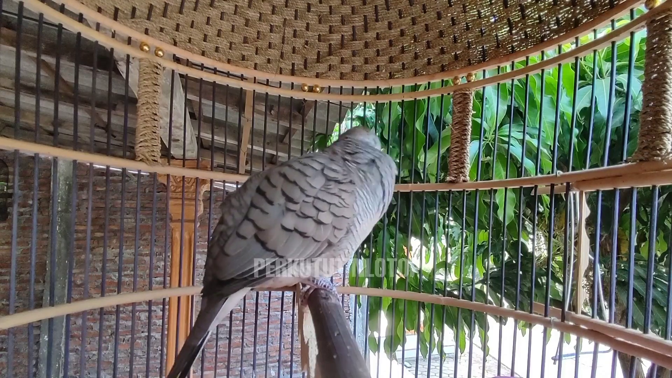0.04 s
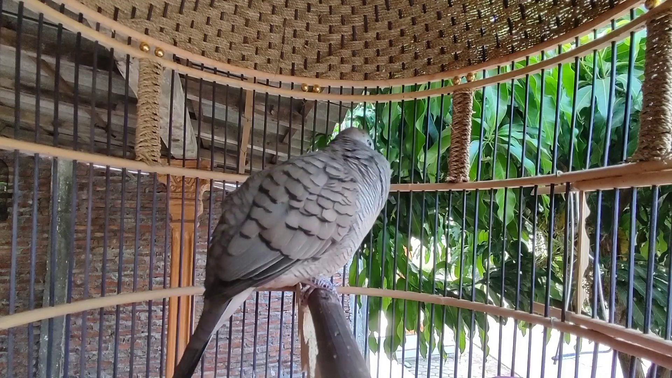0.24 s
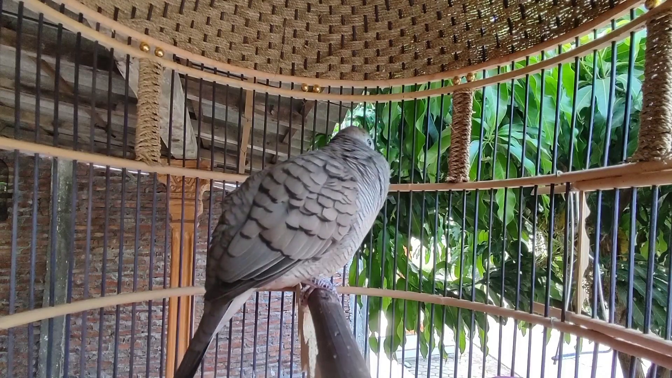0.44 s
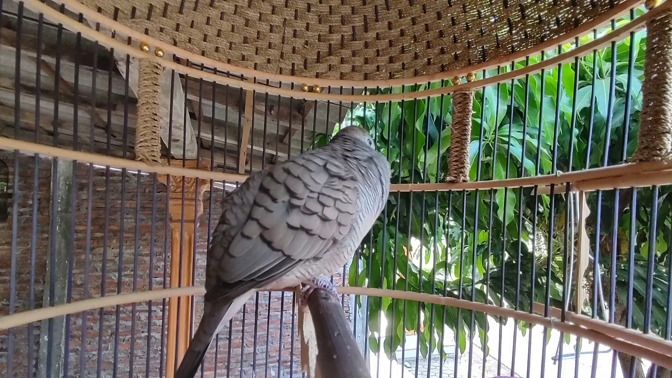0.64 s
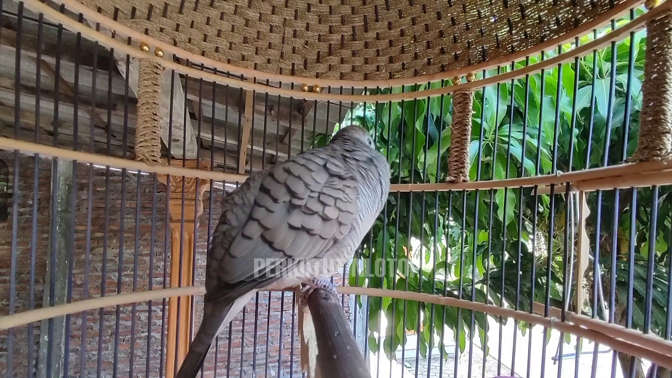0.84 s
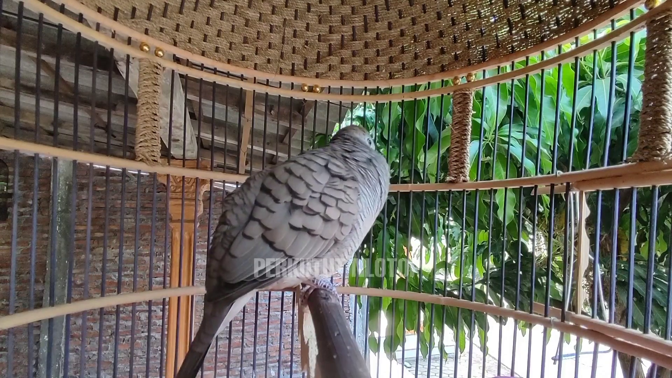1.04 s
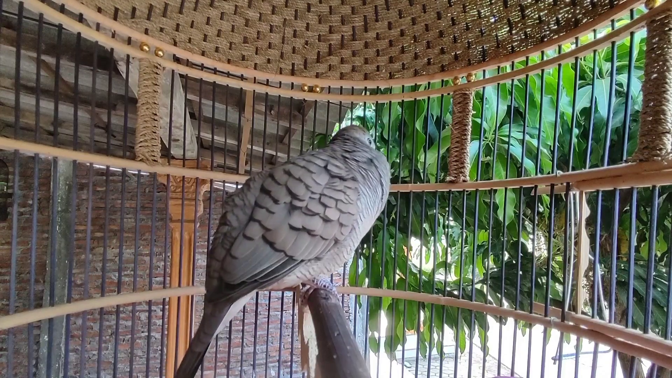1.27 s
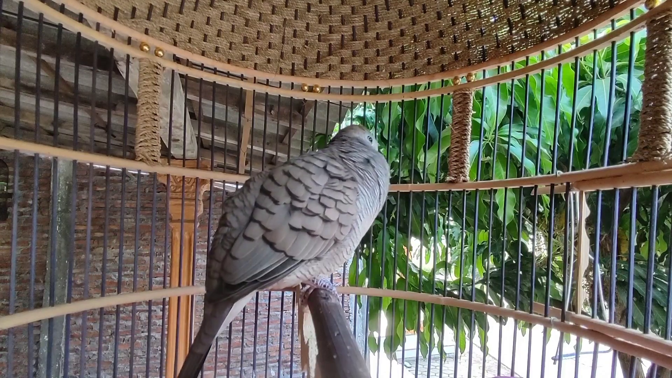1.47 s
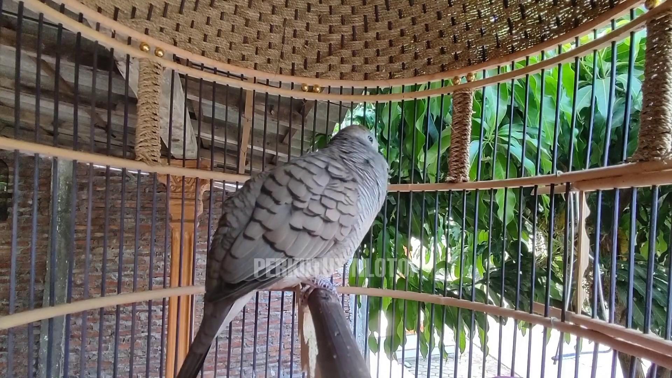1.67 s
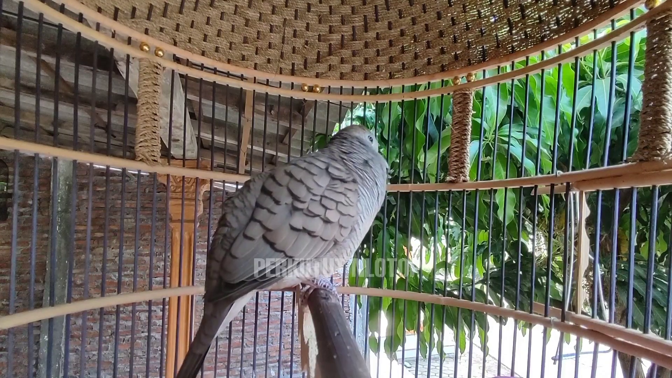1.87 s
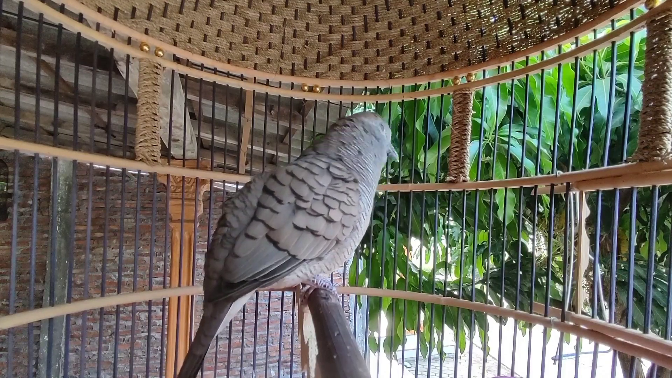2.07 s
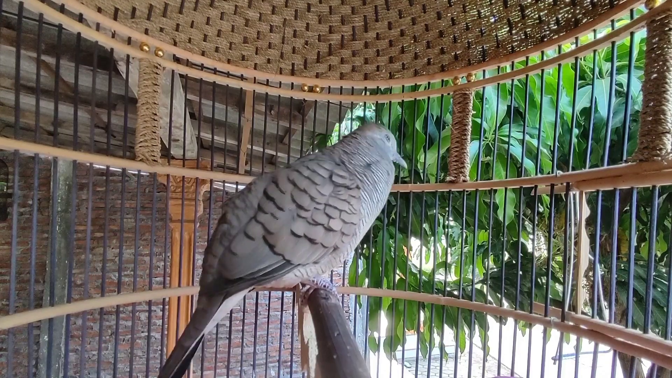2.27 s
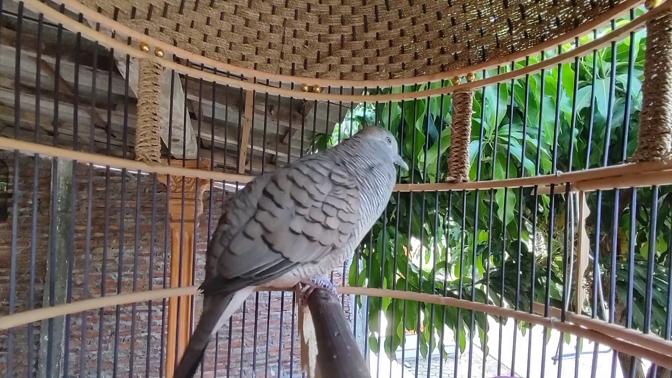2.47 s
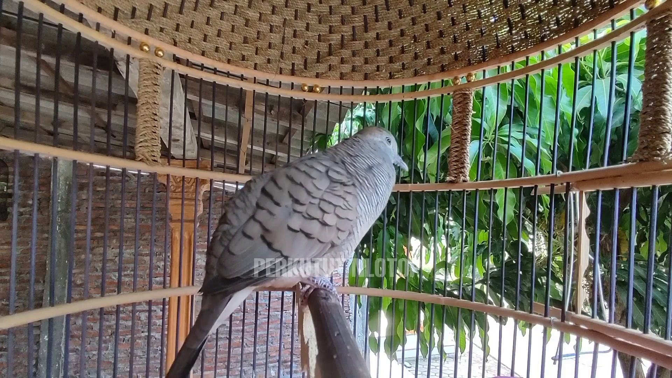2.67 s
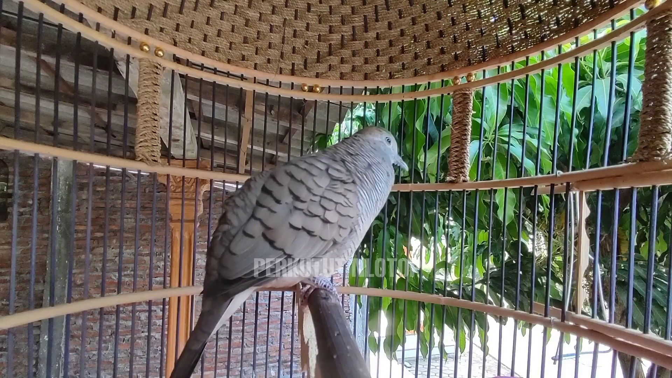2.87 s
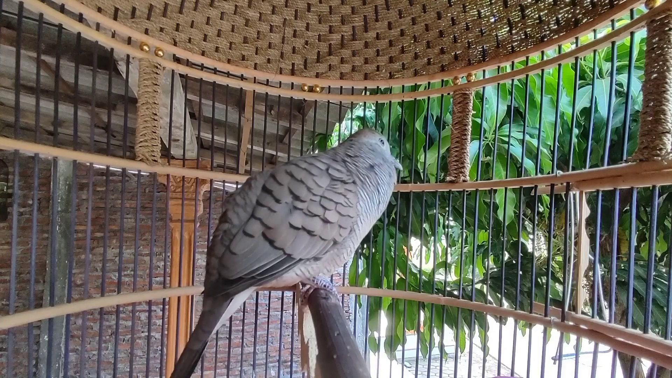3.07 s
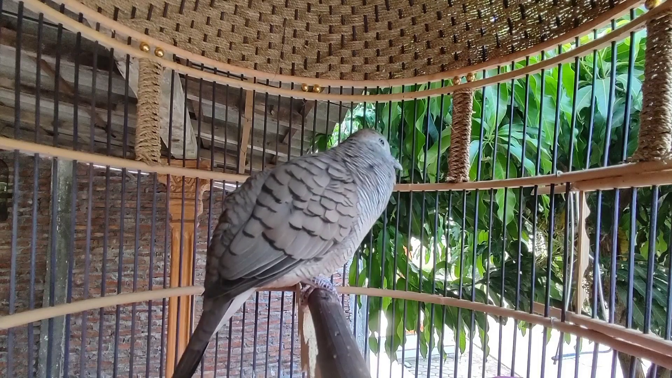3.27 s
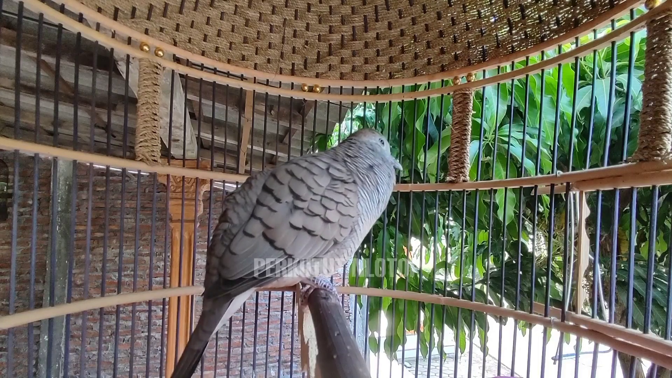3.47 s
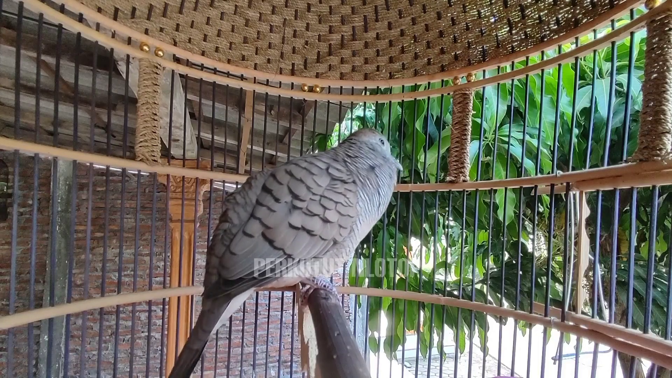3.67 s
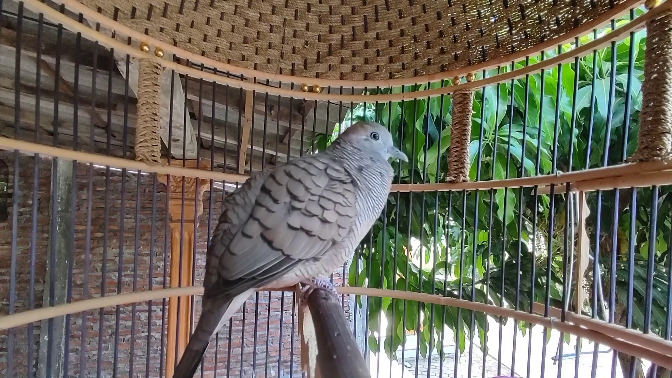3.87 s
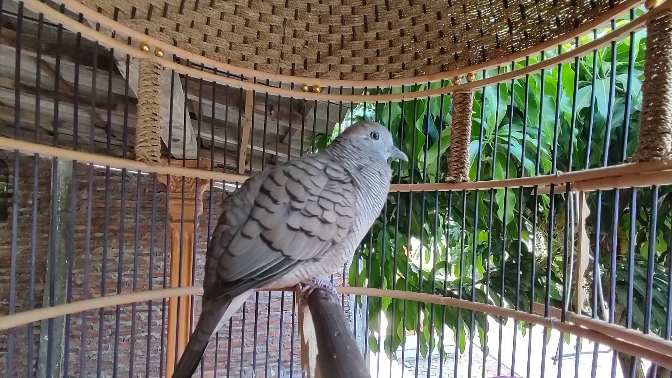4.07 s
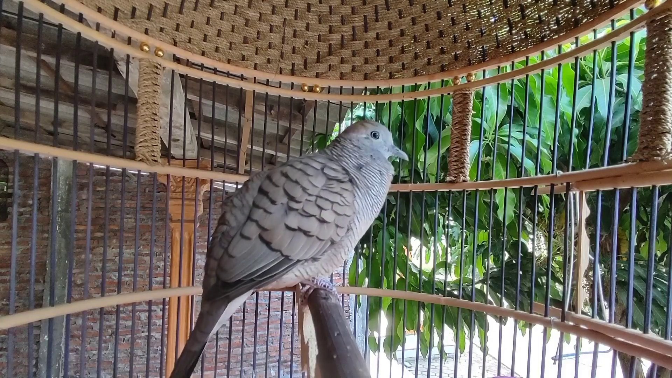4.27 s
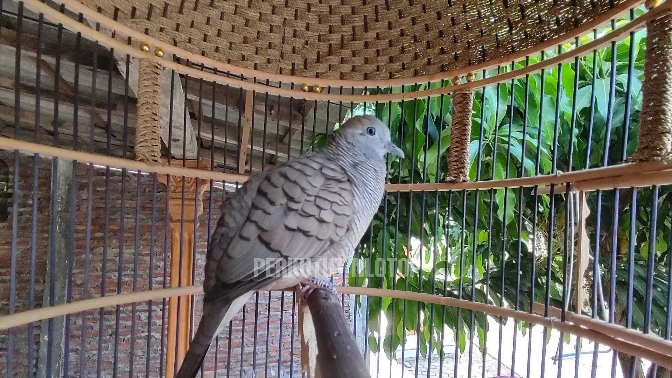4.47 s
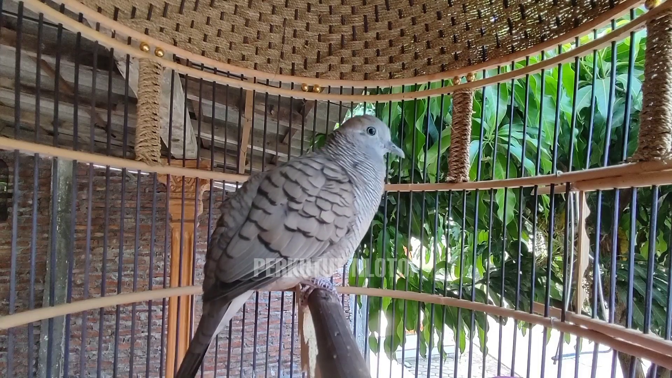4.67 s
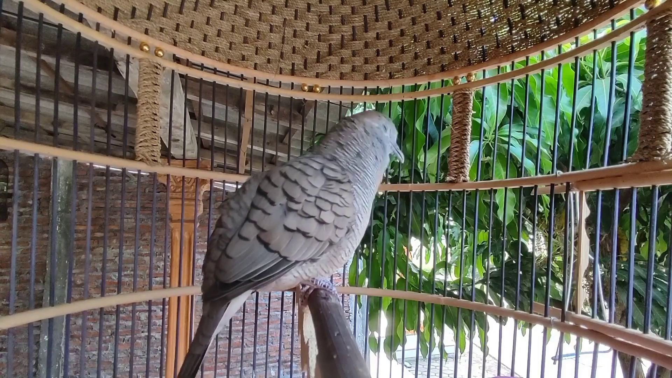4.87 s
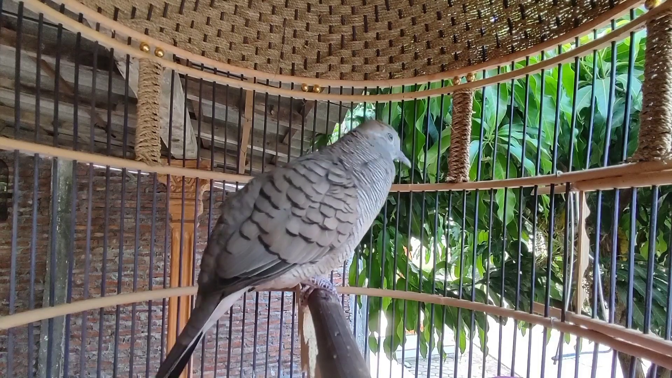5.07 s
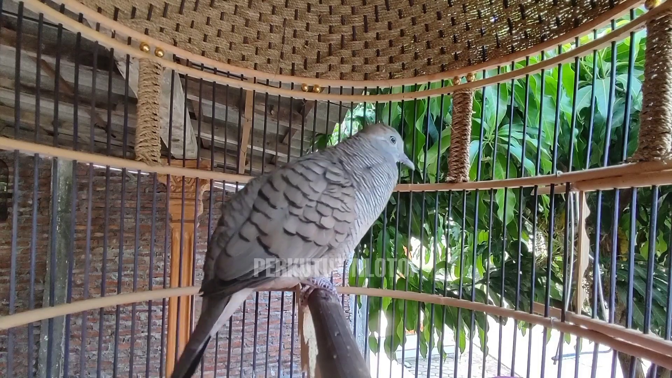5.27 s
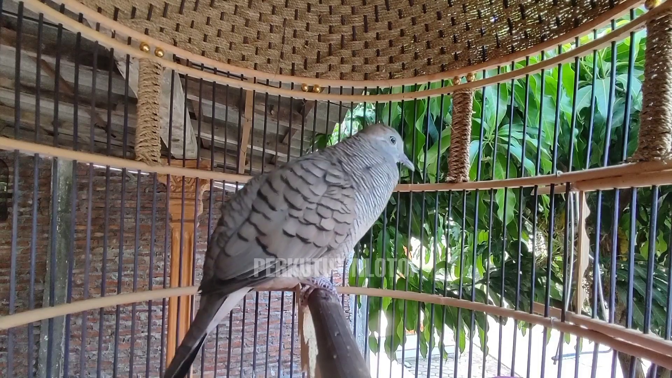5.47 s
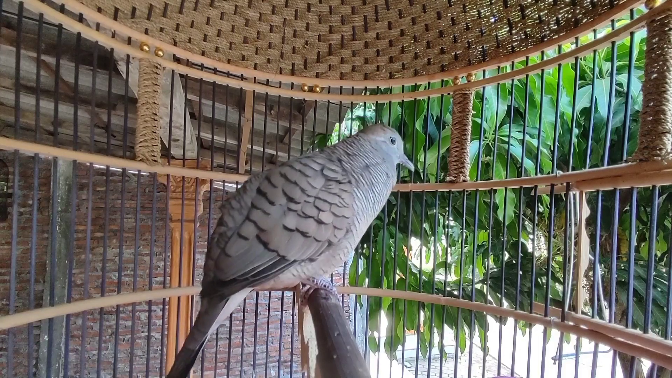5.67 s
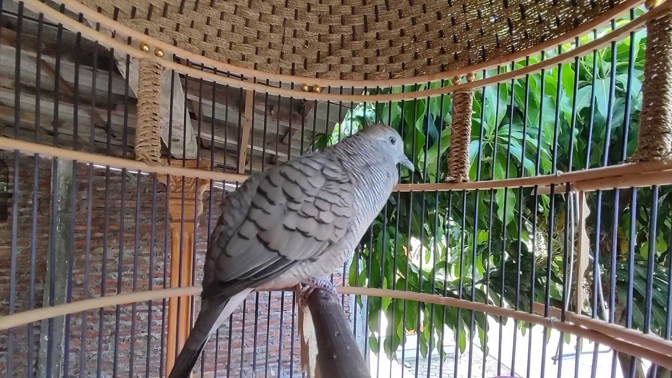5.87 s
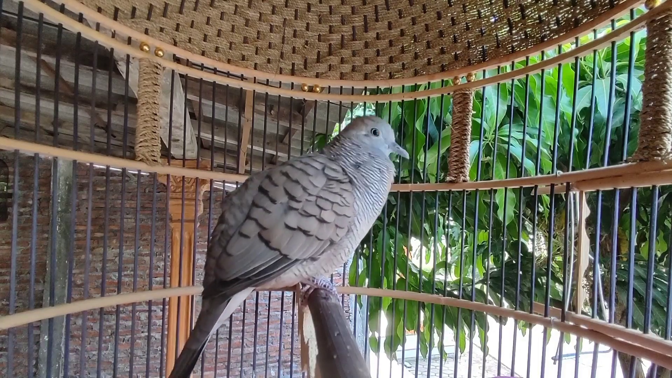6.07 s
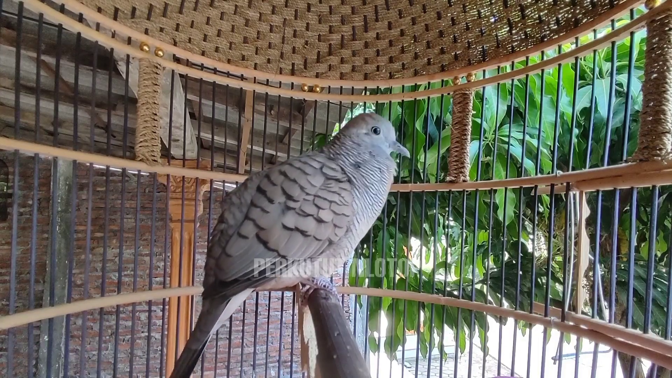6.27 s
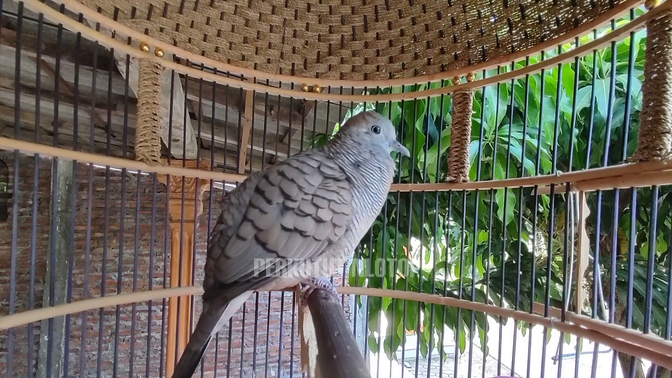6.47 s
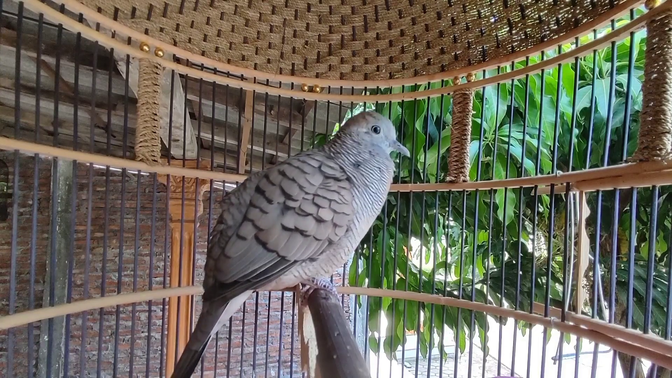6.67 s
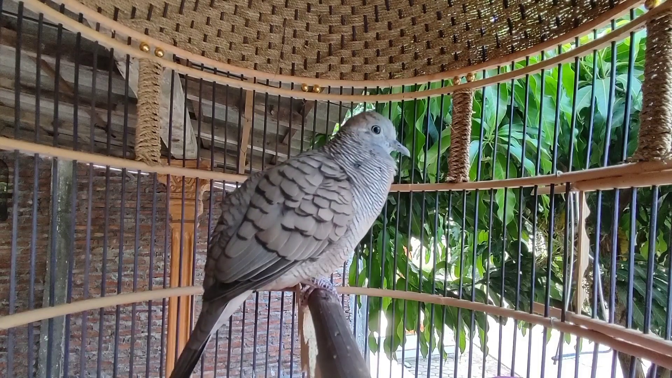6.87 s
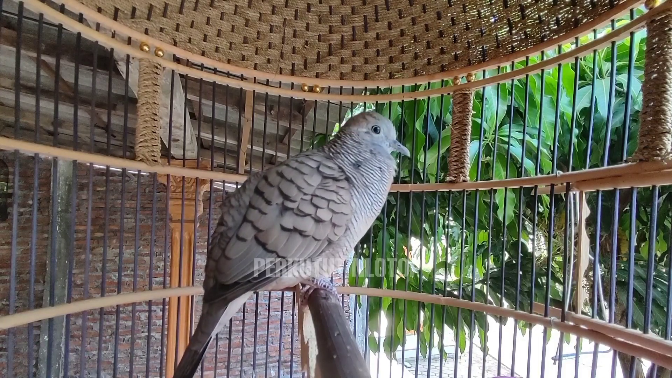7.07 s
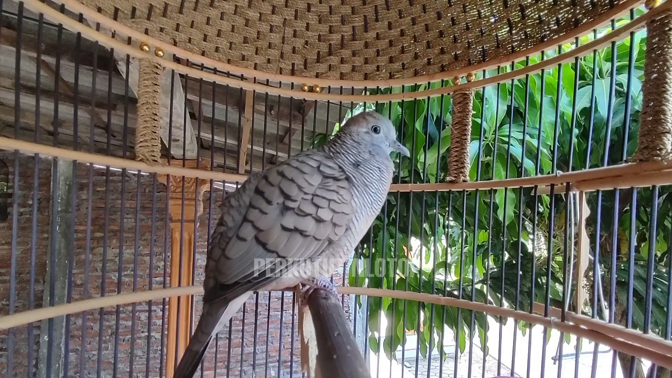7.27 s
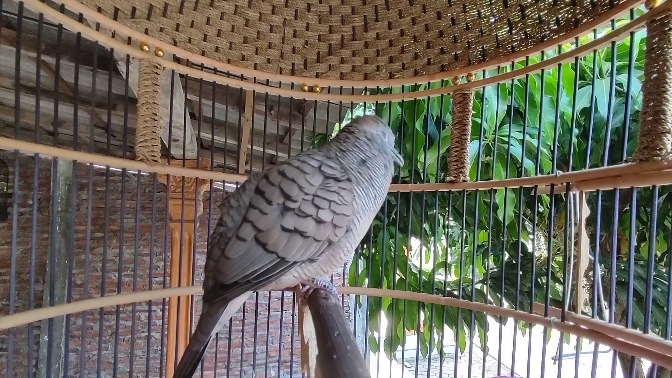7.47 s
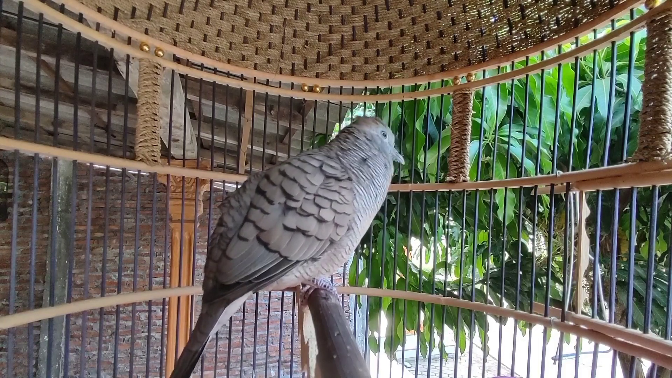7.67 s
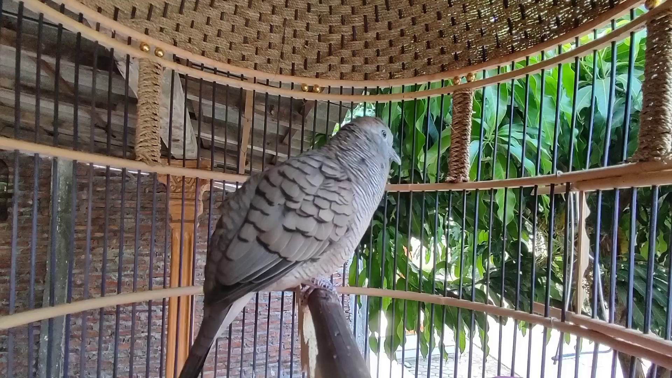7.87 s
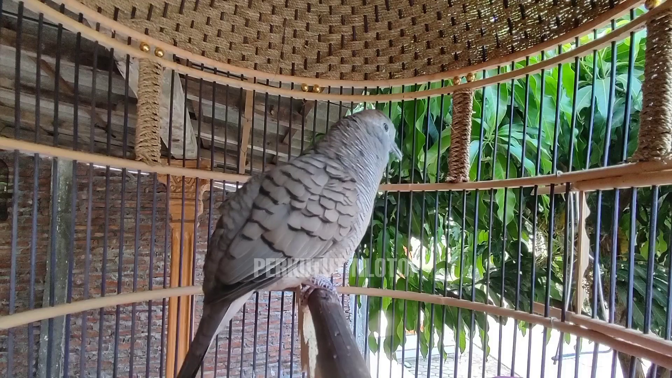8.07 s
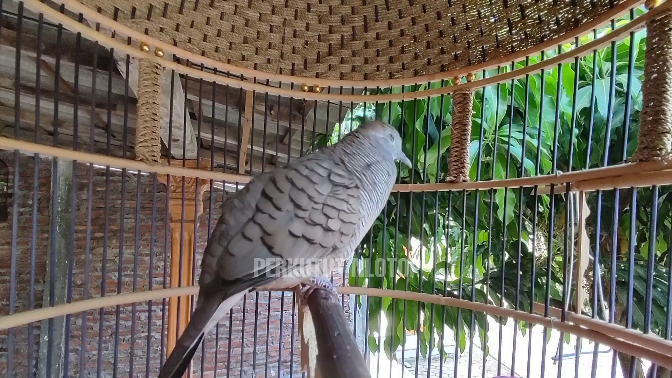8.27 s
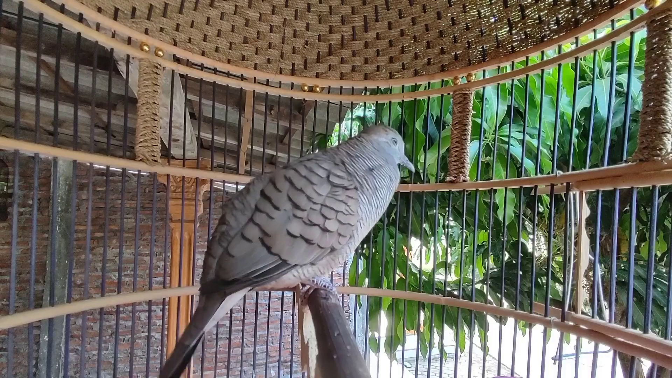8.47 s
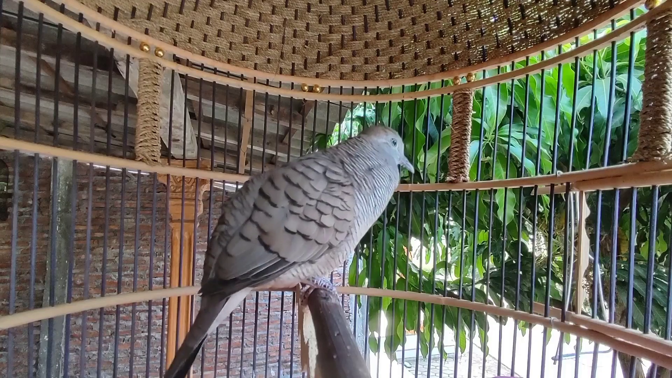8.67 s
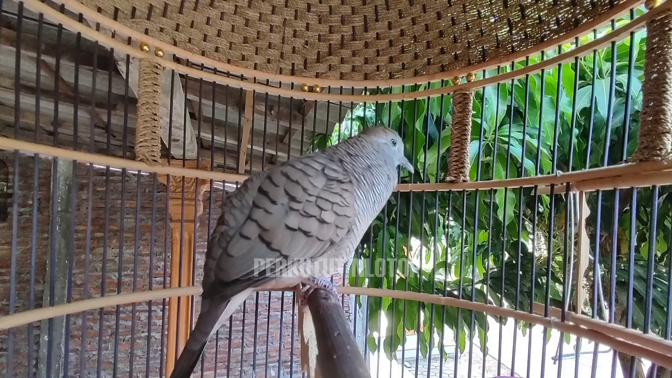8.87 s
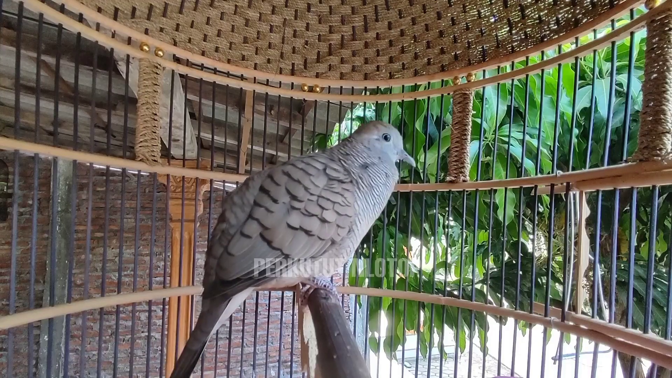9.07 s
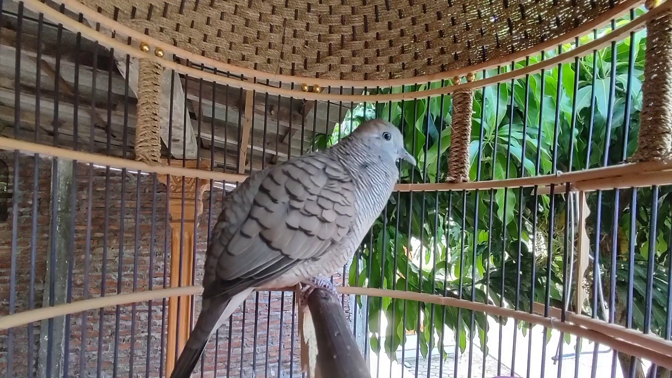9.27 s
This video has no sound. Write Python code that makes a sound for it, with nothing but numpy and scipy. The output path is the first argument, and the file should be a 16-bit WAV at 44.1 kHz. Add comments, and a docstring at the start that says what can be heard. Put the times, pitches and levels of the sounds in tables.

```python
"""A cooing zebra dove

A caged zebra dove coos three times close by: a long quavering note, two short ones and a level last one.
Each note opens with a rasp of quick flaps, then becomes a nearly pure tone (a sine with faint overtones).
Delayed copies and a noise tail give the echoes of cage and porch, and the tone beats against them.
Another dove and small birds whistle far off as gliding sines. Ticks, a rustle and a low outdoor
rumble are shaped noise."""
import sys
import numpy as np
from scipy import signal
from scipy.fft import rfft, irfft, next_fast_len
from scipy.io import wavfile
from scipy.ndimage import uniform_filter1d, map_coordinates

SR = 44100
rng = np.random.default_rng(int(sys.argv[2]) if len(sys.argv) > 2 else 0)


def pcm_store(signal):
    """Save signal as 16-bit PCM."""
    levels = np.round(np.clip(np.atleast_2d(signal), -1, 1) * 32767)
    wavfile.write(sys.argv[1], SR, levels.astype(np.int16).T)


N = 411012  # length of the scene in samples

# In all tables, levels are those before the later gains, filters and echoes.
# Path of pitch and level through each kind of note: time_s, pitch_hz, level_db
LONG = [(0, 902, -26), (.006, 944, -14.5), (.02, 1004, -12.5), (.0235, 1180, -11.3), (.036, 1194, -9.9),
        (.11, 1169, -11.2), (.185, 1121, -12), (.194, 1085, -38)]
SHORT = [(0, 780, -34), (.0055, 897, -17), (.008, 981, -15), (.013, 1104, -14), (.022, 1115, -14.3),
         (.033, 1085, -18.5), (.046, 1060, -39)]
LAST = [(0, 779, -35), (.007, 892, -16), (.011, 973, -14), (.014, 1101, -16), (.025, 1127, -13),
        (.045, 1135, -13), (.08, 1122, -14), (.1, 1073, -19), (.113, 1067, -39)]
# The near dove's phrase: start_s (within the call), shape, gain_db, rasp_length_s
PHRASE = [(0, LONG, 0.04, .022), (0.2069, SHORT, -0.8, .005), (0.2811, SHORT, 0.2, .007),
          (.3647, LAST, -0.4, .007)]
# The near dove's calls: start_s, time_stretch (1 = as in the phrase)
COOS = [(2.2924, 1), (5.1407, 1.013), (8.3153, .977)]
# How strongly throat and beak pass the overtones: frequency_hz, gain_db
THROAT = [(1600, -27), (2000, -31.5), (2220, -34), (2380, -47), (3400, -38), (4500, -44.5), (4800, -47),
          (5700, -45.5), (6400, -43.5), (6800, -33), (7300, -37), (7900, -48), (9200, -57.5), (14000, -58)]
# Ringing set off by one flap of the syrinx, the bird's voice organ: pitch_hz, fall_by_60_db_s, level_db
FLAP_RINGING = [(720, .008, -11), (920, .01, 0), (1340, .014, 0), (1600, .008, -7), (3200, .004, -25),
                (7000, .006, -27)]
# How the closed throat colours the rasp: frequency_hz, gain_db
NECK = [(150, -19.5), (450, -11), (620, -4.5), (800, 4), (1600, -3.5), (2000, -18.5), (3500, -4),
        (6500, -1), (14000, -5.5)]
# Colour of the air rushing through the beak: frequency_hz, gain_db
AIR = [(200, -3), (700, -1), (1500, -5), (3000, -1), (5000, -16.5), (7200, -6.5), (9500, -10.5),
       (14000, -5)]
# Direct path and near reflections at each microphone: delay_ms, gain_db
LEFT_PATHS = [(.12, -5), (4.68, -7.9), (5.37, -8.4), (6.72, -9), (8.91, -18.7), (11.82, -15.6),
              (24.69, -16.8), (27.72, -22.6), (37.68, -19.9)]
RIGHT_PATHS = [(0, -4.1), (2.61, -6.3), (4.74, -15.4), (6.66, -2.2), (8.76, -13.2), (13.02, -8.6),
               (20.25, -14.5), (24.39, -21.3), (26.55, -14.9)]
# How long echoes last on the porch and across the garden: frequency_hz, fall_by_60_db_s
PORCH = [(300, .35), (1100, .39), (3000, .28), (8000, .25), (14000, .2)]
GARDEN = [(300, .4), (1100, .5), (4000, .4), (8000, .3)]
# The far dove's calls: start_s, gain_db
FAR_COOS = [(.412, -34.5), (4.622, -34.5), (8.228, -38)]
# The far dove's phrase: start_s (within the call), shape, gain_db, pitch_share (of the shape's pitch)
FAR_PHRASE = [(0, LONG, 0.5, 1.02), (.205, SHORT, 4, .98), (.285, SHORT, 2.5, .93), (.37, SHORT, 4.5, .98),
              (.485, LAST, 1, 0.98)]
# Low far hoots, falling chirps, rising whistles and sharp chips: start_s, length_s, pitch_hz, level_db
HOOTS = [(.15, 0.26, 419, -52.5), (1.68, 0.18, 441, -62), (5.36, 0.19, 303, -54.5)]
CHIRPS = [(.23, .06, 3045, -61), (1.26, .07, 4300, -68), (1.39, .09, 4880, -69), (2.005, .11, 4446, -59),
          (4.24, .07, 3760, -57.5), (4.335, .15, 4640, -58.5), (4.4, .06, 3040, -61),
          (4.77, .06, 3310, -61), (7.59, 0.066, 4750, -60), (8.96, .07, 4450, -62)]
WHISTLES = [(.53, .15, 3140, -58), (8.012, .165, 3296, -50.5)]
CHIPS = [(7.34, 0.0195, 4500, -61), (7.368, 0.037, 4500, -55.5), (7.42, .028, 4530, -55)]
# Light ticks in the cage: start_s, level_db
TICKS = [(.787, -63), (0.984, -54), (3.09, -46)]
# Colour of the outdoor noise: frequency_hz, level_db (per Hz, relative)
FLOOR = [(15, -36), (25, -3.5), (48, -3.5), (66, -13.5), (95, -9.5), (140, -10), (300, -12), (436, -15.5),
         (632, -19), (1330, -22), (3010, -21.5), (3530, -25), (4850, -31), (5690, -32), (7610, -32),
         (14000, -35)]
# How alike the outdoor noise starts out on left and right: frequency_hz, likeness (0 to 1)
ALIKE = [(60, 1), (150, .93), (370, 0.64), (910, 0.31), (2260, 0), (5610, 0.65), (13900, 0)]
# How the recorder turns quiet passages down: middle_band_level_db, gain_db
SUPPRESSION = [(-63, -6.5), (-51.5, -3), (-31, 0.5)]

# Pitch from start to end of each kind of far call, as shares of the call's own pitch
HOOT_ARC, CHIRP_ARC = (1, 1.01), (1.02, 1, .95)
WHISTLE_ARC, CHIP_ARC = (.72, .95, 1.24, 1.25, 1.25), (1.22, .93, 1.1)

# The long note quavers after its upward break; the first two are times within the note
BREAK_S, CREST_S, QUAVERS_PER_S = .0235, .048, 24
QUAVER_HZ, DIP_DB_PER_S = 22.98, 26  # swing of the pitch either way; how fast the level dips deepen
CLICK_LEAD_S, CLICK_DB = .0592, -24.5  # the throat clicks open before each call
TSIP_GAP_S, TSIP_S, TSIP_HZ, TSIP_DB = .31, .06, 7750, -71.5  # typical values, scattered later
RUSTLE_S, RUSTLE_LENGTH_S, RUSTLE_DB = 3.28, 0.3, -57.5
TOP_HZ = 14350  # the recorder keeps nothing above this


def dove(overtone_left_db=-8, overtone_right_db=0, air_db=-53, tail_db=-18.0):
    """The fundamental spreads all round from the swollen throat; the beak beams the overtones to the right."""
    tone, overtones, effort = np.zeros((3, N))
    for s, shape, db, _ in notes():
        for track, part in zip((tone, overtones, effort), coo(shape)):
            add(track, s, amp(db) * part)
    hiss = unit(filtered(rng.standard_normal(N), lambda hz: amp(along(AIR, hz))))
    air = amp(air_db) * effort * hiss
    body = tone + rasp() + air
    left_delay = round(LEFT_PATHS[0][0] / 1000 * SR)
    left_beam = amp(overtone_left_db) * np.roll(overtones, left_delay)
    beam = np.array([left_beam, amp(overtone_right_db) * overtones])
    spill = amp(-16) * overtones  # the part of the overtones that reaches the walls
    tail = echoes(amp(tail_db) * (body + overtones), PORCH)
    return near_walls(body + spill) + beam + tail


def notes():
    """List every note of the near dove: start, shape, gain and rasp length."""
    return [(s + stretch * after, shape, db, length)
            for s, stretch in COOS for after, shape, db, length in PHRASE]


def coo(shape, pitch_share=1, jitter=0.00069, shimmer_db=2.5, dull_db=-10, brightening=.35,
        clipped_db=2.5, count=12):
    """Sing one note: a sine on a moving pitch, overtones at its multiples, and their shared loudness curve."""
    is_long = shape == LONG
    s, hz, db = np.transpose(shape)
    t = np.arange(int(s[-1] * SR)) / SR
    quaver = is_long * (t > BREAK_S) * np.cos(2 * np.pi * QUAVERS_PER_S * (t - CREST_S))
    quaver = uniform_filter1d(quaver, size=128)
    unsteady = 1 + jitter * wobble(700, size=len(t))
    pitch = pitch_share * (np.interp(t, s, hz) + QUAVER_HZ * quaver) * unsteady
    phase = 2 * np.pi * np.cumsum(pitch) / SR
    # the level dips between the crests of pitch
    dip_db = is_long * DIP_DB_PER_S * t * (1 - quaver) / 2
    soft_ends = np.clip(np.minimum(t, t[-1] - t) / .001, 0, 1)
    swell = amp(np.interp(t, s, db) - dip_db) * soft_ends
    # overtones above the second are weaker while the pitch is low
    dull = np.interp(pitch, [1000, 1100], [dull_db, 0])

    def overtone(k):
        colour_db = along(THROAT, k * pitch) + dull * (k > 2) + shimmer_db * wobble(90, size=len(t))
        return amp(colour_db) * np.sin(k * phase)

    press_db = 0 if is_long else clipped_db  # the brief notes are pressed harder
    overtones = amp(press_db) * sum(overtone(k) for k in range(2, count + 1))
    # overtones grow faster than the tone itself
    brighter = (swell / np.median(swell)) ** abs(brightening)
    return swell * np.sin(phase), swell * overtones * brighter, swell


def rasp(start_hz=150, end_hz=665, scatter=0.15, start_db=-28, long_db=-18, short_db=-25, crack_db=-19):
    """Before a tone catches, the syrinx flaps ever faster and harder, and each flap rings the throat."""
    age = np.arange(SR // 50) / SR
    flap = sum(amp(db - 60 * age / t60) * np.sin(2 * np.pi * hz * age) for hz, t60, db in FLAP_RINGING)
    flap *= 1 - np.exp(-(age / 0.00037) ** 2)  # soft onset
    flap /= np.abs(flap).max()
    track = np.zeros(N)
    for s, shape, db, length in notes():
        progress = np.linspace(0, 1, int(length * SR))
        uneven = np.exp(scatter * (1 - progress) * wobble(410, size=len(progress)))
        rate = np.interp(progress, [.2, .65], [start_hz, end_hz]) * uneven
        end_db = long_db if shape == LONG else short_db
        # one flap each time the running count passes a whole number
        starts = np.diff(np.floor(np.cumsum(rate) / SR), prepend=-1) > 0
        for u in progress[starts]:
            flap_db = db + start_db + (end_db - start_db) * np.sqrt(u) + rng.normal(0, 2.2)
            add(track, s - length * (1 - u), amp(flap_db) * flap)
    track = filtered(track, lambda hz: amp(along(NECK, hz)))
    # the click is added past the neck filter, so it keeps its own colour
    for s, _ in COOS:
        crack = amp(crack_db) * rng.standard_normal(len(age))
        pop = np.sin(2 * np.pi * 1050 * age)
        add(track, s - CLICK_LEAD_S, amp(CLICK_DB - 60 * age / .006) * (pop + crack))
    return track


def near_walls(x):
    """Direct sound and near reflections arrive as delayed, weaker copies at two microphones."""
    out = np.zeros((2, N))
    for ear, paths in zip(out, (LEFT_PATHS, RIGHT_PATHS)):
        for ms, db in paths:
            add(ear, ms / 1000, amp(db) * x)
    return out


def far_doves():
    """Another dove sings the same kinds of note as plain wavering tones; low far hoots join it."""
    track = whistled(HOOTS, HOOT_ARC, waver=0.019, throb_db=4.5)
    for s, call_db in FAR_COOS:
        for after, shape, db, pitch_share in FAR_PHRASE:
            tone = coo(shape, pitch_share, jitter=0.026)[0]
            add(track, s + after, amp(call_db + db) * tone)
    return distant(track, direct_db=-4.0, wet_db=1.7, right_db=0.6)


def small_birds(scatter_s=.09, scatter_db=3.0, scatter_hz=110):
    """Chirps, whistles and chips are gliding tones, along with a loose series of thin high tsips."""
    beats = np.arange(.1, N / SR, TSIP_GAP_S)
    chances = rng.standard_normal((len(beats), 3))
    tsips = [(abs(s + scatter_s * late), TSIP_S, TSIP_HZ + scatter_hz * sharp, TSIP_DB + scatter_db * loud)
             for s, (late, sharp, loud) in zip(beats, chances)]
    track = whistled(CHIRPS, CHIRP_ARC, waver=0.0088, throb_db=4)
    track += whistled(tsips, CHIRP_ARC, waver=0.023, throb_db=3)
    track += whistled(WHISTLES, WHISTLE_ARC, waver=.025, throb_db=2.5)
    track += whistled(CHIPS, CHIP_ARC, waver=.035, throb_db=8)
    return distant(track, direct_db=-0.5, wet_db=-1.0, right_db=2.5)


def whistled(rows, arc, waver, throb_db):
    """Whistle each row as a sine that follows one arc of pitch, wavering in pitch and level."""
    track = np.zeros(N)
    for s, length, hz, db in rows:
        u = np.linspace(0, 1, int(length * SR))
        glide = np.interp(u, np.linspace(0, 1, len(arc)), arc)
        pitch = hz * glide * (1 + waver * wobble(300, size=len(u)))
        swell = np.sqrt(np.abs(np.sin(np.pi * u))) * amp(throb_db * wobble(90, size=len(u)))
        add(track, s, amp(db) * swell * np.sin(2 * np.pi * np.cumsum(pitch) / SR))
    return track


def distant(track, direct_db, wet_db, right_db):
    """A far sound is heard largely through its garden echoes; right_db lifts the right, lowers the left."""
    both = amp(direct_db) * track + amp(wet_db) * echoes(track, GARDEN)
    return both * amp([[-right_db], [right_db]])


def echoes(x, decay):
    """Many blurred echoes act as a stereo noise tail: it builds up quickly and each frequency fades at its own speed."""
    hz, t, z = signal.stft(rng.standard_normal((2, SR * 3 // 4)), SR, nperseg=256)
    build = 1 - np.exp(-t / .008)
    fade = amp(-60 * t / along(decay, hz)[:, None])
    tail = signal.istft(z * fade * build, SR, nperseg=256)[1]
    return signal.fftconvolve(x[None], tail / np.linalg.norm(tail[0]), axes=1)[:, :N]


def ticks(t60=.015):
    """Short ticks of the cage are noise bursts that die by 60 dB in t60 seconds, with near reflections."""
    track, age = np.zeros(N), np.arange(SR // 20) / SR
    for s, db in TICKS:
        add(track, s, amp(db - 60 * age / t60) * rng.standard_normal(len(age)))
    colour = [(300, -6), (1000, -13), (3500, 7.5), (12000, -16.0)]  # frequency_hz, gain_db
    return near_walls(filtered(track, lambda hz: amp(along(colour, hz))))


def feathers():
    """The dove shifts its feathers: one soft rustle of shaped noise that swells and fades."""
    u = np.clip((np.arange(N) / SR - RUSTLE_S) / RUSTLE_LENGTH_S, 0, 1)
    colour = [(300, -2), (1000, -3), (2500, 0), (5000, -17.5), (12000, -21.5)]  # frequency_hz, gain_db
    noise = filtered(rng.standard_normal((2, N)), lambda hz: amp(along(colour, hz)))
    return amp(RUSTLE_DB) * np.sin(np.pi * u) * unit(noise)


def outdoors(rumble_db=-54, hiss_db=-62.5, flutter_db=1.56, right_db=1.43, split_hz=600, low_hz=30, lead_ms=.25):
    """Low rumble, much alike on both sides, lies under a thin patchy hiss; each swells by itself."""
    # mixing a shared and an opposed noise sets how alike the two sides are
    def turn(hz):
        return np.arccos(np.clip(along(ALIKE, hz), -1, 1)) / 2

    mid, side = filtered(rng.standard_normal((2, N)),
                         lambda hz: amp(along(FLOOR, hz)) * [np.cos(turn(hz)), np.sin(turn(hz))])
    noise = np.array([mid + side, mid - side])
    noise = filtered(noise, lambda hz: hz ** 4 / (hz ** 4 + low_hz ** 4))
    rumble = filtered(noise, lambda hz: 1 / (1 + (hz / split_hz) ** 4))
    hiss = patchy(noise - rumble, depth_db=1.7)
    # the rumble reaches the left a moment before the right
    rumble = np.array([rumble[0], np.roll(rumble[1], round(lead_ms * SR / 1000))])

    def swell(db):
        return amp(db + flutter_db * wobble(6, size=N))

    both = swell(rumble_db) * unit(rumble) + swell(hiss_db) * unit(hiss)
    return both * amp([[-right_db], [right_db]])


def patchy(noise, depth_db):
    """Give noise patches of random gain in time and frequency."""
    z = signal.stft(noise, nperseg=512)[2]
    field = uniform_filter1d(rng.standard_normal(z.shape[1:]), size=9, axis=0)
    field = uniform_filter1d(field, size=16, axis=1)
    return signal.istft(z * amp(depth_db * unit(field)), nperseg=512)[1][:, :N]


def suppressor(x, window_s=.05):
    """The gain follows the level of the middle band, so the background rises with loud calls."""
    middle = filtered(x, lambda hz: (hz > 800) & (hz < 5000))
    power = np.abs(uniform_filter1d(np.mean(middle ** 2, axis=0), size=int(window_s * SR)))
    level_db = 10 * np.log10(power + 1e-12)
    return x * amp(np.interp(level_db, *np.transpose(SUPPRESSION)))


def amp(db):
    """Turn decibels into a gain."""
    return 10 ** (np.asarray(db) / 20)


def unit(x):
    """Scale a sound to an average (rms) level of 1."""
    return x / np.sqrt(np.mean(x ** 2) + 1e-20)


def along(points, hz):
    """Read a value between (frequency, value) points on a log frequency axis."""
    f, v = np.transpose(points)
    return np.interp(np.log(hz + 1), np.log(f + 1), v)


def wobble(rate, size):
    """Draw a smooth random curve through rate random points a second."""
    points = rng.standard_normal(int(size * rate / SR) + 4)
    return map_coordinates(points, [np.arange(size) * rate / SR])


def filtered(x, response):
    """Multiply the spectrum of x by a gain that depends on frequency."""
    size = next_fast_len(N + SR // 2)
    return irfft(rfft(x, size) * response(np.fft.rfftfreq(size, 1 / SR)), size)[..., :N]


def add(track, s, sound):
    """Mix a sound into a track, starting at s seconds."""
    part = track[round(s * SR):][:len(sound)]
    part += sound[:len(part)]


def scene():
    """Mix the near dove, the far birds, the cage, the feathers and the open air."""
    return dove() + far_doves() + small_birds() + ticks() + feathers() + outdoors()


def record(dry):
    """The recorder turns quiet passages down and keeps nothing above its top frequency."""
    return filtered(suppressor(dry), lambda hz: hz < TOP_HZ)


dry = scene()
out = record(dry)
pcm_store(out)
```